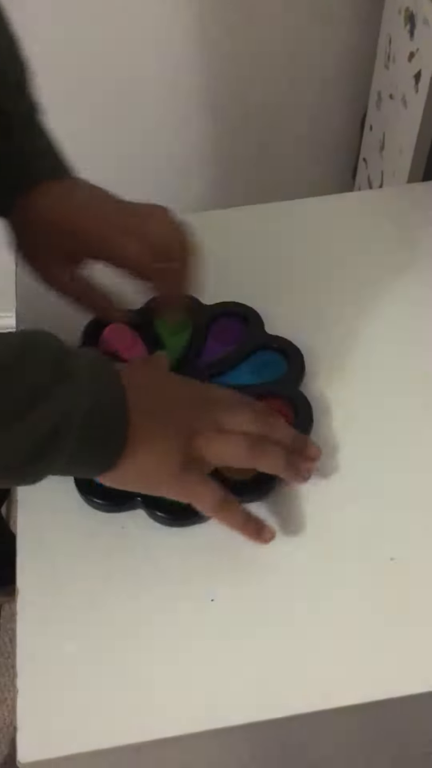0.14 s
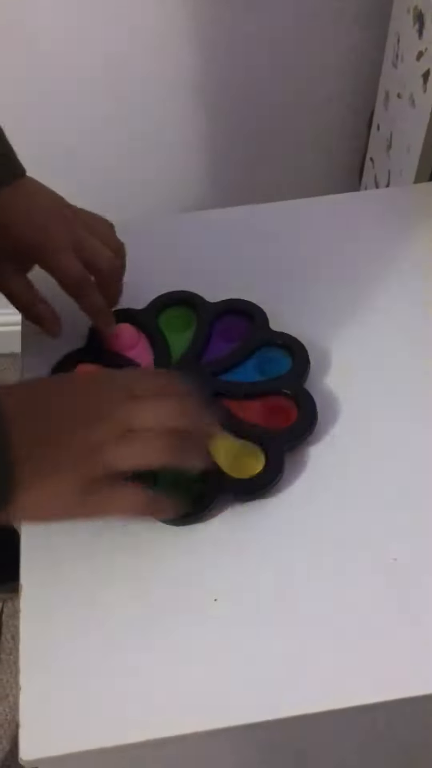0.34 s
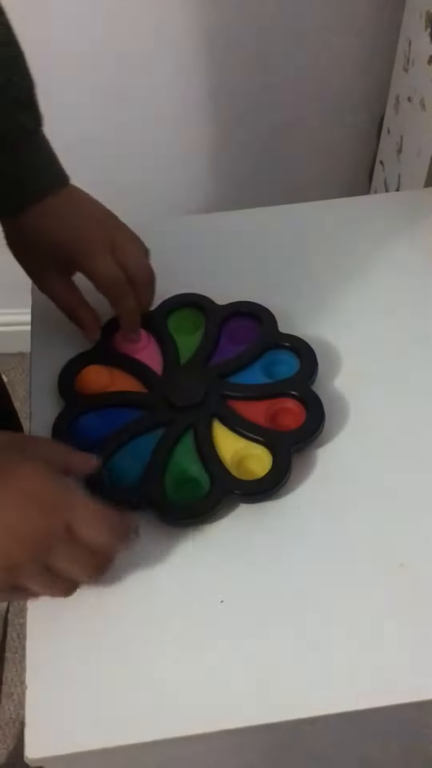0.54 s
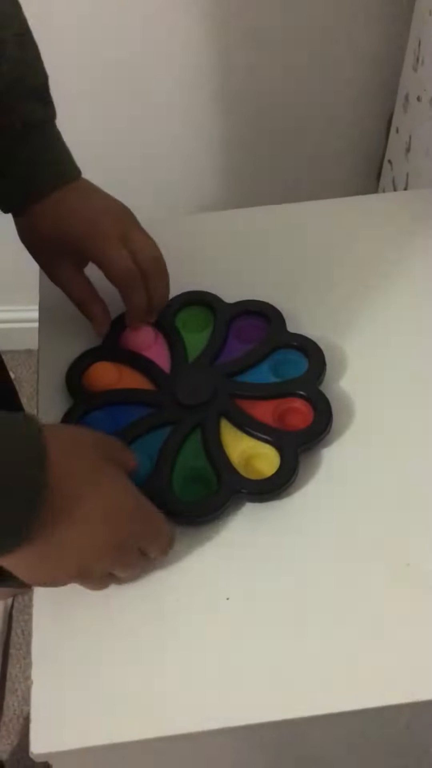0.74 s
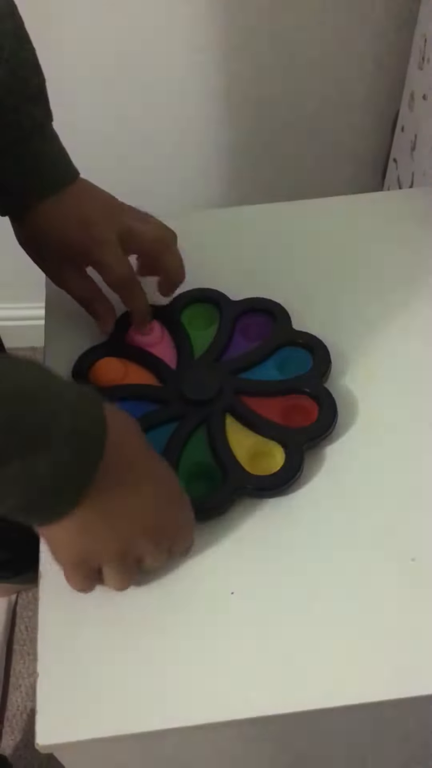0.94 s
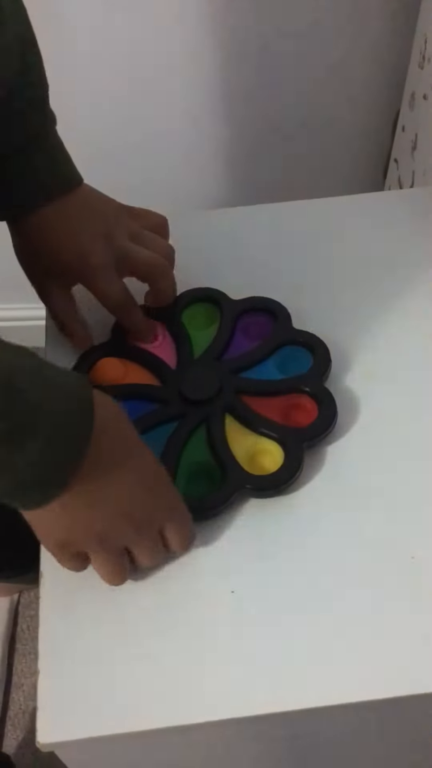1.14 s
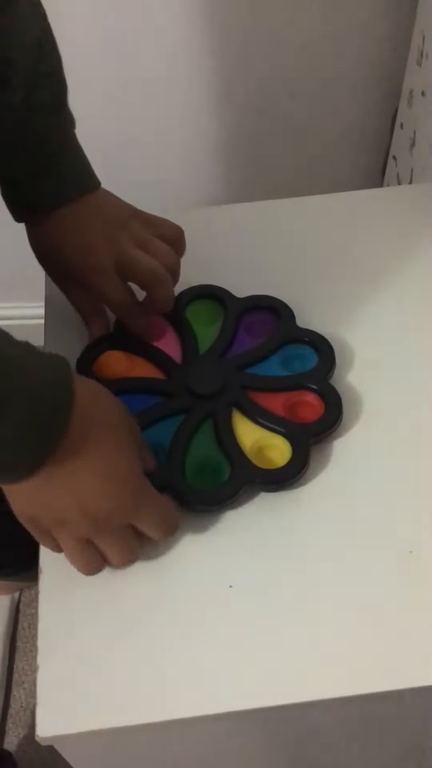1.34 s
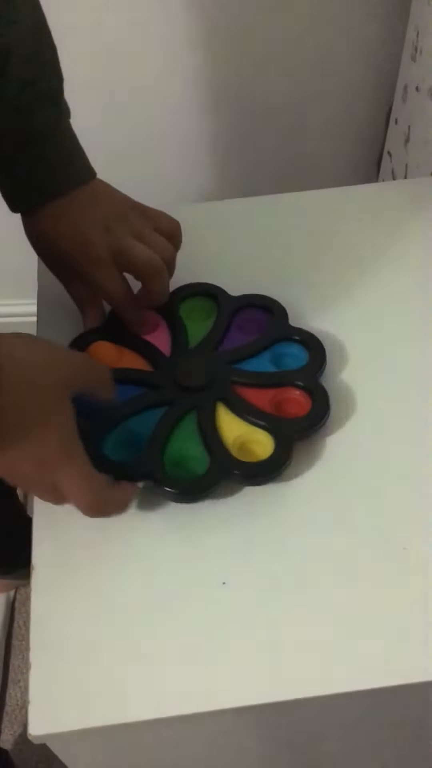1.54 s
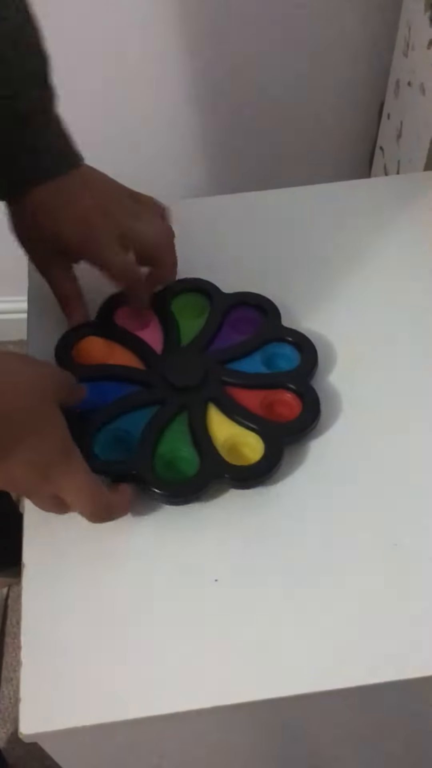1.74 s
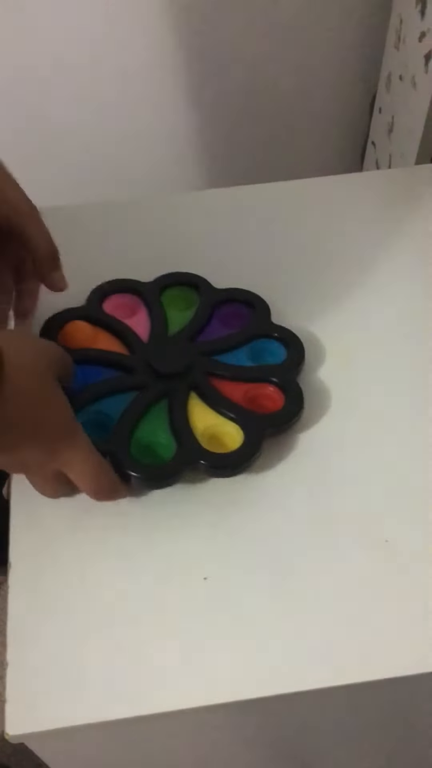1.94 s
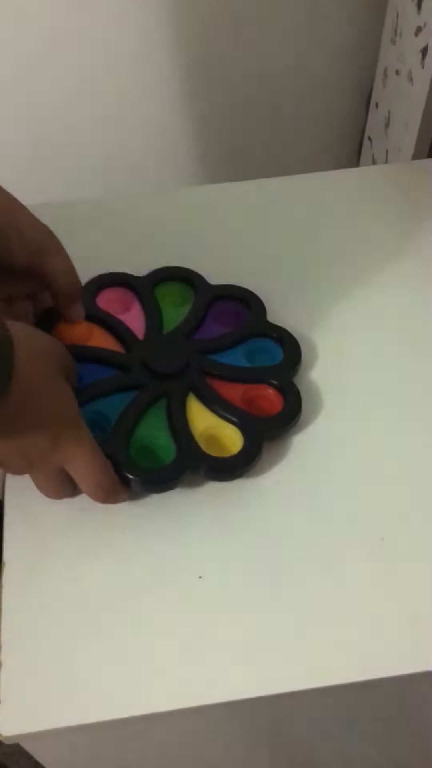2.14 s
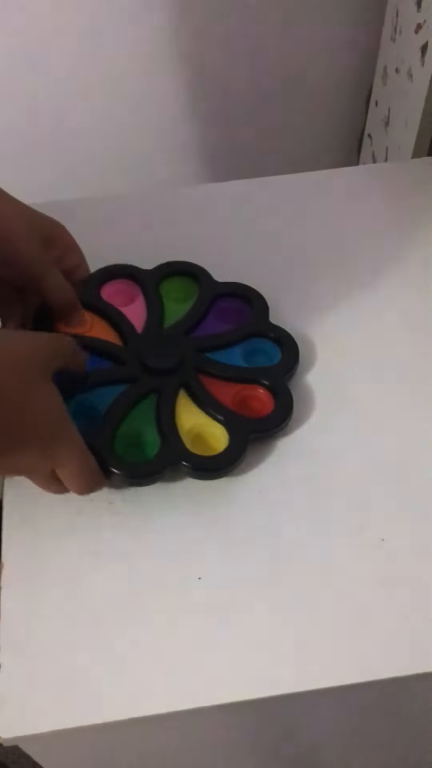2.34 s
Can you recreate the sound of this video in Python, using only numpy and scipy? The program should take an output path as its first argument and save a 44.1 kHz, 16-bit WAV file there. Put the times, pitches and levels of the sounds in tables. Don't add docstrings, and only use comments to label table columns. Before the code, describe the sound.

Silicone bubble popping toy handled on a hollow table, with sharp pops, hard knocks and clicks

```python
import sys
import numpy as np
from scipy import signal
from scipy.fft import rfft, irfft, next_fast_len
from scipy.io import wavfile
from scipy.ndimage import map_coordinates

SR = 44100
rng = np.random.default_rng(int(sys.argv[2]) if len(sys.argv) > 2 else 0)


def wav_record(signal):
    frames = np.transpose(np.atleast_2d(signal))
    bounded = np.clip(frames, -1, 1)
    quanta = np.round(bounded * 32767).astype(np.int16)
    wavfile.write(sys.argv[1], SR, quanta)


def natural_amplitude(level_db):
    exponent = np.asarray(level_db, float) / 20
    return 10 ** exponent


N = 110250

# frequency [Hz], density [dB per Hz].
HUM_AND_HISS = [(15, -18), (33, -5.5), (165, -8), (400, -22), (750, -27), (1300, -27), (2000, -30),
                (3000, -33.5), (15700, -40.5)]
# start [s], level
# [dB], t60 [s], loaded pitch of the main mode [Hz].
BOOMS = [(0.0, -42, 0.43, 135), (0.065, -29, 0.23, 134), (0.2489, -14, 0.38, 134),
         (0.406, -22, 0.52, 136.7), (0.5072, -18, 0.2, 145.2), (0.553, -29, 0.3, 135.8),
         (0.721, -39, 0.37, 132), (1.002, -33.5, 0.24, 134.7), (1.1126, -20, 0.25, 135.5),
         (1.163, -30, 0.25, 134.3), (1.244, -33.5, 0.19, 136), (1.39, -50, 0.44, 136.8),
         (1.502, -42, 0.42, 132.6), (1.558, -33.5, 0.2, 137.7), (1.659, -44, 0.41, 135.7),
         (1.779, -58, 0.21, 138.6), (1.875, -45, 0.58, 138.7), (2.045, -37, 0.38, 138),
         (2.137, -35, 0.1, 133.6), (2.253, -56.5, 0.99, 132.8), (2.448, -35, 0.38, 139.2),
         (2.476, -28, 0.39, 130)]
# frequency [Hz], level [dB], share of the push's t60 [ratio].
BOARD_MODES = [(134.9, 0.5, 0.95), (104.3, -12, 0.43), (190.5, -15, 0.72), (263.5, -13, 0.35),
               (292, -25.5, 1), (474, -29, 0.57)]
DAMPS = [
    .178,
    .5,
    .546,
    .62,
    .785,
    1.188,
    1.31,
    2.23,
    2.474,
    9,
]
# centre [s], level [dB], pitch [Hz].
LEANS = [(.01, -44.5, 60.6), (0.159, -48, 69), (1.029, -50.5, 63), (1.175, -38.5, 232), (1.272, -47, 60.3),
         (1.368, -58.5, 48.6), (1.551, -45.5, 55.7), (2.209, -57, 62.5), (.12, -57, 736), (.16, -58, 766),
         (0.598, -48, 470), (1.32, -53, 640), (1.877, -56.5, 420), (2.431, -49.5, 305)]
# start [s], length [s], level [dB].
RUBS = [
    (0, 0.072, -51),
    (0.199, 0.051, -58),
    (0.598, 0.081, -57.5),
    (0.687, 0.093, -66.5),
    (0.992, 0.018, -52),
    (1.231, 0.019, -50),
    (1.48, 0.1, -58),
    (2.03, 0.09, -55),
    (2.444, 0.069, -51),
]
# frequency [Hz], density [dB per Hz].
SKIN = [(100, -43.5), (250, -4), (700, -15.5), (1200, -9), (2300, -19), (3300, -19.5), (9000, -27.5),
        (13000, -33), (15000, -28)]
# time [s], peak
# [dB].
PEELS = [(.008, -43), (.036, -63.5), (.2424, -32), (.399, -49), (.4997, -39.5), (1.1025, -32), (1.109, -49),
         (1.165, -63), (1.247, -27), (1.255, -29), (1.395, -53), (1.448, -49.5), (2.039, -46.5),
         (2.088, -57), (2.0993, -35), (2.104, -25.5), (2.153, -39.5), (2.4232, -43), (2.446, -51.5),
         (2.477, -45), (2.483, -41)]
# frequency [Hz], width [Hz], level [dB].
FILM = [(5400, 3700, 0), (8800, 1200, 4), (11730, 3300, 4.5), (14900, 2000, -15)]
# time [s], peak [dB], pitch [Hz].
CATCHES = [(0.024, -55, 3200), (.047, -43, 3780), (.058, -36.5, 3480), (1.164, -42, 3600),
           (1.176, -44, 3200), (2.478, -36, 2050), (.204, -53, 3260), (0.237, -56, 3100),
           (1.4612, -54, 2600), (1.481, -50.5, 2000), (1.49, -64, 1700), (1.504, -49, 2700),
           (1.514, -49, 4000), (1.5235, -47, 2380), (1.54, -56, 1100), (1.552, -50, 2000),
           (1.663, -57.5, 3190), (1.738, -60.5, 3400), (1.809, -61, 2050), (1.810, -59.5, 4000),
           (1.832, -56.5, 2850), (1.837, -58, 1400), (1.857, -56.5, 1960), (1.873, -57, 2160)]
# time [s], peak [dB], brightness [dB per octave].
POPS = [(.024, -42, -4.5), (.048, -32.5, 3), (.058, -33, 2), (.068, -42, -2), (.077, -41.5, 5.5),
        (.229, -51.5, -5.5), (.716, -49, 6), (1.235, -24.5, 0.5), (1.2435, -38.5, 6), (1.2543, -22, 2.5),
        (1.263, -50, 3), (2.0875, -25.5, -6.5), (2.4245, -25.5, -2.5), (2.477, -31, -9)]
# frequency [Hz], width [Hz], level [dB].
BUBBLE = [(594, 120, -15), (998, 150, -10.5), (1014, 200, -2.5), (1305, 160, 4.5), (1703, 300, -3.5),
          (2160, 98, 2.5), (2440, 380, -6.5), (4000, 1300, -8.5), (5800, 1500, -18.5), (10000, 5100, -29.5)]
# time [s], peak [dB].
TICKS = [(0.064, -46), (0.087, -50), (.099, -46), (.205, -47.5), (.219, -55.5), (.249, -28.5),
         (0.2564, -31.5), (0.272, -34), (.2805, -32), (.408, -59), (.413, -42), (0.418, -35.5), (.426, -40),
         (0.5138, -24.5), (.523, -25.5), (.535, -42), (.548, -53.5), (.579, -43.5), (0.999, -45.5)]
# frequency [Hz], width [Hz], level [dB].
LOOSE_PART = [(5550, 260, 5), (9200, 1800, -6), (12000, 1600, -2), (14600, 2200, -7)]
# time [s], peak [dB], brightness [dB per octave].
KNOCKS = [(.2423, -7, -0.5), (.2575, -27, -2.5), (.2735, -19.5, -5.5), (.2755, -26.5, 2.5),
          (.287, -30.5, 0), (.3988, -15.5, -1), (.409, -32.5, -1.5), (.4185, -32.5, -2.5), (.4215, -23, -2),
          (.4995, -14, -1.5), (.5105, -23, -4), (.5225, -22.5, -0.5), (.724, -44, -10),
          (.992, -44.5, -10.5), (.9995, -41, -9.5), (2.039, -37.5, -7.5)]
# frequency [Hz], width [Hz], level [dB].
FRAME = [(442, 750, -10), (596, 150, -22.5), (1163, 120, 4), (1700, 260, 6), (1824, 100, 8.5),
         (2310, 140, -12.5), (2700, 190, 4.5), (3185, 140, 6.5), (3980, 220, 3), (4320, 89, 1),
         (4790, 200, -12), (5530, 250, -4.5), (6520, 770, -6.5), (10500, 6000, -3)]
# start [s], length [s], level [dB].
SCRAPES = [
    (.79, 0.067, -73.5),
    (1.455, 0.095, -69),
    (1.65, 0.02, -72),
    (1.745, 0.035, -63.5),
    (1.8, 0.16, -77),
    (2.04, 0.035, -62.5),
    (2.27, 0.077, -66),
]
# frequency [Hz], width [Hz], level [dB].
NAIL = [(1200, 300, -5), (2100, 250, 0), (2750, 250, -2)]
# time [s], peak [dB].
TAPS = [
    (.798, -48.5),
    (.836, -50),
    (1.66, -57),
    (1.833, -55.5),
    (1.873, -59),
]
# time [s], peak [dB], brightness [dB per octave].
SLAPS = [
    (1.1027, -14, 0),
    (1.163, -33, 0),
    (1.169, -34.5, -9.5),
    (1.746, -45.5, -0.5),
    (2.297, -44, 1.5),
]
# frequency [Hz], width [Hz], level [dB].
RIM = [(377, 220, -5), (1100, 190, 7.5), (1700, 120, 0.5), (2050, 290, 3.5), (2560, 370, -4),
       (2905, 130, -7.5), (3200, 270, 2.5), (3940, 130, 0.5), (5050, 660, -26), (5840, 320, 0),
       (6400, 200, 2), (6940, 580, -4.5), (8910, 2600, 3.5), (13100, 4000, -23)]
# time [s], peak [dB], brightness [dB per octave].
CRACKS = [
    (2.0995, -6.5, -0.5),
    (2.1085, -32.5, -13),
]
# frequency [Hz], width [Hz], level [dB].
DOME = [(590, 390, -8.5), (998, 110, -3), (1323, 160, 6), (1880, 130, -3.5), (2480, 240, 1.5),
        (2700, 93, 3.5), (3100, 270, -8.5), (3760, 240, -9.5), (4230, 200, -6), (5510, 270, -5),
        (6080, 220, -4), (7600, 1500, -8), (11550, 10000, -16)]
# delay [s], level [dB].
NEAR_WALLS = [
    (.0045, -14),
    (.009, -15),
    (0.0128, -15),
    (0.023, -25.5),
    (0.039, -25),
]
# frequency [Hz], t60 [s].
ROOM_DECAY = [(200, 0.4), (1200, 0.37), (3000, 0.29), (6000, 0.25), (14000, 0.17)]


def unit(x):
    return x / np.sqrt(np.mean(x ** 2) + 1e-20)


def along(points, hz):
    f, v = np.transpose(points)
    return np.interp(np.log(hz + 1), np.log(f + 1), v)


def filtered(x, response):
    m = next_fast_len(len(x) + min(len(x) // 2, SR // 4))
    return irfft(rfft(x, m) * response(np.fft.rfftfreq(m, 1 / SR)), m)[:len(x)]


def add(track, s, sound):
    part = track[max(round(s * SR), 0):][:len(sound)]
    part += sound[:len(part)]


def resonance(f, hz, width):
    return 1j * f * width / (hz * hz - f * f + 1j * f * width)


def alternating(body):
    return (-1) ** np.arange(len(body))


def floor():
    def colour(f):
        return natural_amplitude(along(HUM_AND_HISS, f)) * (1 + 0.28 * np.abs(resonance(f, 135, 14)))
    return natural_amplitude(-60.5) * unit(filtered(rng.standard_normal(N), colour))


def booms():
    swell_s, damp_t60, unloaded_hz = 0.0052, 0.041, 135
    out, t = np.zeros(N), np.arange(SR // 2) / SR
    for s, db, t60, loaded_hz in BOOMS:
        luck = rng.standard_normal(len(BOARD_MODES))
        luck[0] = 0
        ring = np.zeros(len(t))
        for r, (hz, mode_db, share) in zip(luck, BOARD_MODES):
            decay = natural_amplitude(mode_db + 2 * r - 60 * t / (t60 * share))
            ring += decay * np.sin(2 * np.pi * hz * loaded_hz / unloaded_hz * t + r)
        next_damp = min(d for d in DAMPS if d > s)
        held = np.maximum(t + s - next_damp, 0)
        swell = (1 - np.exp(-t / swell_s)) ** 2
        add(out, s, natural_amplitude(db - 60 * held / damp_t60) * swell * ring)
    return out


def leans():
    cycles = 1.8
    out, t = np.zeros(N), np.arange(SR // 2) / SR
    for s, db, hz in LEANS:
        bump = np.exp(-(t * hz / cycles - 2) ** 2)
        add(out, s - 2 * cycles / hz, natural_amplitude(db) * bump * np.sin(2 * np.pi * hz * t))
    return out


def strokes(rows):
    t, level = np.arange(N) / SR, np.zeros(N)
    for s, length, db in rows:
        level += natural_amplitude(db) * np.abs(np.sin(np.pi * np.clip((t - s) / length, 0, 1))) ** 0.5
    return level


def uneven_grip():
    return natural_amplitude(3 * map_coordinates(rng.standard_normal(N // 100), [np.arange(N) / SR * 300]))


def rubs(grip):
    skin = filtered(rng.standard_normal(N), lambda f: natural_amplitude(along(SKIN, f)))
    return strokes(RUBS) * unit(grip * skin)


def bursts(events, body):
    t60 = 0.017
    out, t = np.zeros(N), np.arange(SR // 30) / SR
    hz, width, level = np.transpose(body)[:, :, None]
    for s, db in events:
        gains = natural_amplitude(2 * rng.standard_normal(len(body))) * alternating(body)
        gains = gains[:, None] * natural_amplitude(level)
        noise = rng.standard_normal(len(t)) * natural_amplitude(-60 * t / t60)
        burst = filtered(noise, lambda f: (gains * resonance(f, hz, width)).sum(0))
        add(out, s, natural_amplitude(db - 1) * burst / np.abs(burst).max())
    return out


def peels():
    return bursts(PEELS, FILM)


def catches():
    cycles = 13
    out, t = np.zeros(N), np.arange(SR // 50) / SR
    for s, db, hz in CATCHES:
        rough = 1 + 0.4 * rng.standard_normal(len(t))
        add(out, s, natural_amplitude(db - 20 * t * hz / cycles) * np.sin(2 * np.pi * hz * t) * rough)
    return out


def strikes(events, body, snap_s, lag_cycles):
    narrowest_hz, rise_hz = 150, 890
    chatter_db, chatter_t60, chatter_wider, chatter_dull_hz = -7, 0.062, 3.2, 2560
    out, t = np.zeros(N), np.arange(SR // 8) / SR
    hz, width, level = np.transpose(body)[:, :, None]
    width = np.maximum(width, narrowest_hz)
    for s, db, *bright in events:
        luck = rng.standard_normal((len(body), 1))
        noise = rng.standard_normal((3, len(t)))
        snap = (1 + noise[0] / 6) * t * np.exp(-t / snap_s)
        grains = noise[1] * np.abs(noise[2]) * natural_amplitude(-60 * t / chatter_t60)
        tilt = sum(bright) * np.log2(hz / 1500)
        gains = alternating(body)[:, None] * natural_amplitude(level + 1.2 * luck + tilt)

        def shell(f, w):
            late = np.exp(-2j * np.pi * lag_cycles * f / hz)
            return (gains * resonance(f, hz, w) * resonance(f, hz, w + rise_hz) * late).sum(0)

        def settling(f):
            return shell(f, chatter_wider * width) / (1 + 1j * f / chatter_dull_hz)

        ring = filtered(snap / np.linalg.norm(snap), lambda f: shell(f, width))
        ring = ring + natural_amplitude(chatter_db) * filtered(grains / np.linalg.norm(grains), settling)
        add(out, s, natural_amplitude(db) * ring / np.abs(ring).max())
    return out


def pops():
    return strikes(POPS, BUBBLE, snap_s=0.00025, lag_cycles=0.39)


def ticks():
    return bursts(TICKS, LOOSE_PART)


def knocks():
    return strikes(KNOCKS, FRAME, snap_s=0.0001, lag_cycles=1.085)


def scrapes(grip):
    def frame(f):
        return sum(sign * natural_amplitude(db) * resonance(f, hz, w) for sign, (hz, w, db) in zip(alternating(NAIL), NAIL))
    return strokes(SCRAPES) * unit(filtered(rng.standard_normal(N) * grip, frame))


def taps():
    return strikes(TAPS, BUBBLE, snap_s=0.00025, lag_cycles=0.39)


def slaps():
    return strikes(SLAPS, RIM, snap_s=0.0001, lag_cycles=0.8)


def cracks():
    return strikes(CRACKS, DOME, snap_s=0.0001, lag_cycles=0.48)


def walls(near):
    def echoes(f):
        return sum(natural_amplitude(db) * np.exp(-2j * np.pi * f * s) for s, db in NEAR_WALLS) / (1 + (f / 5000) ** 2)
    return filtered(near, echoes)


def room(near):
    delay_s = 0.0032
    out, step = np.zeros(N), SR // 10
    for a in range(0, N, step):
        hz, t, z = signal.stft(rng.standard_normal(SR // 2), SR, nperseg=256)
        decay = natural_amplitude(-60 * t / along(ROOM_DECAY, hz)[:, None])
        tail = signal.istft(z * decay, SR, nperseg=256)[1]
        add(out, a / SR + delay_s, signal.fftconvolve(near[a:a + step], tail / np.linalg.norm(tail)))
    return out


def scene():
    near = knocks() + slaps() + pops() + taps() + cracks()
    near = near + catches() + ticks() + peels()
    grip = uneven_grip()
    near = near + rubs(grip) + scrapes(grip)
    mix = near + walls(near) + natural_amplitude(-14) * room(near) + booms() + leans() + floor()
    return mix[None]


def roll_off(x):
    return signal.sosfilt(signal.butter(12, 16550, fs=SR, output="sos"), x)


def record(dry):
    dip_hz, dip_db, top_hz, low_hz = 10220, -4.5, 15650, 29

    def microphone(f):
        dip = natural_amplitude(dip_db * np.exp(-((f - dip_hz) / 600) ** 2))
        return dip / (1 + (f / top_hz) ** 80) / (1 + (low_hz / (f + 1)) ** 8)

    mix = filtered(dry[0], microphone)[None]
    return roll_off(mix)


dry = scene()
out = record(dry)
wav_record(out)
```